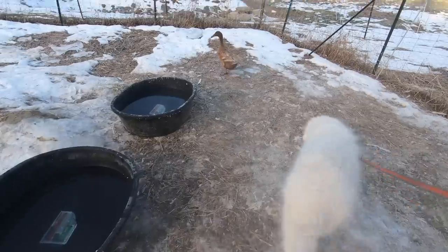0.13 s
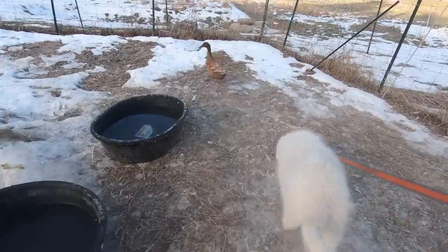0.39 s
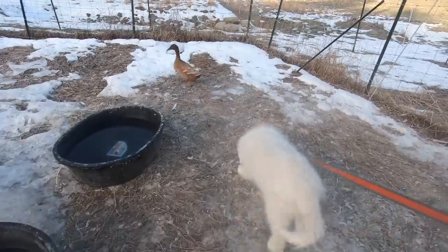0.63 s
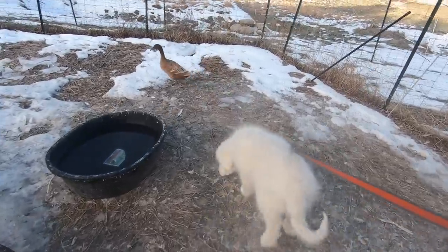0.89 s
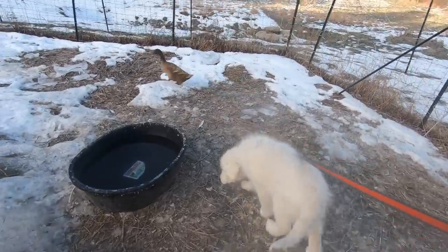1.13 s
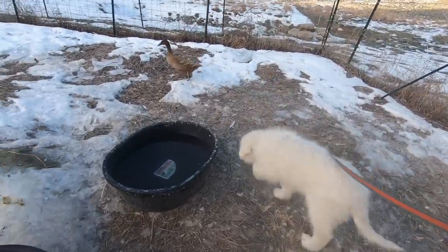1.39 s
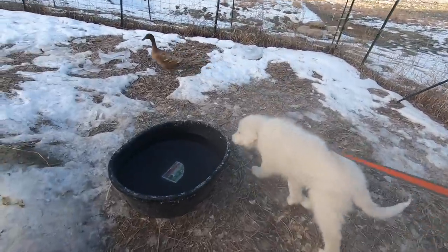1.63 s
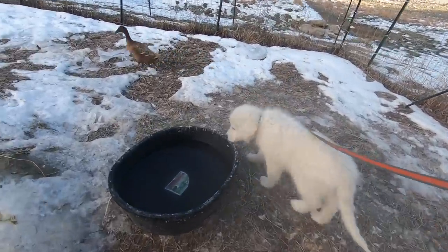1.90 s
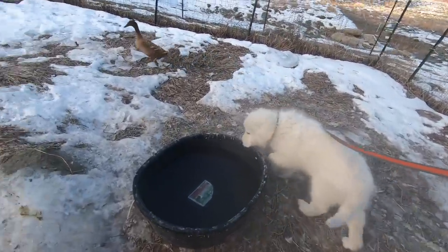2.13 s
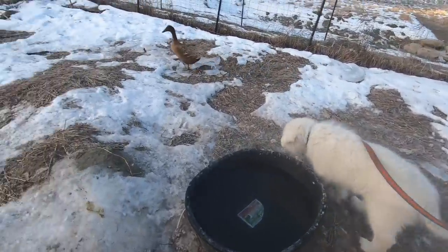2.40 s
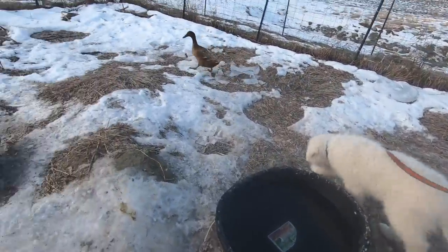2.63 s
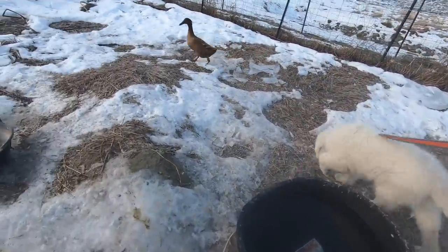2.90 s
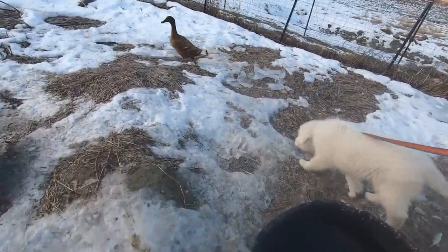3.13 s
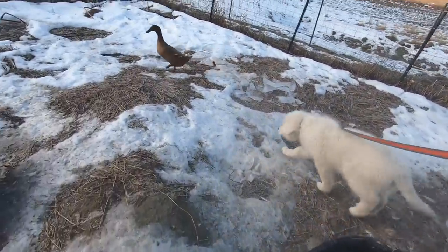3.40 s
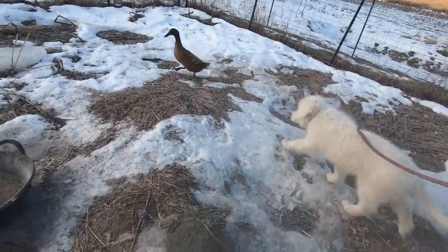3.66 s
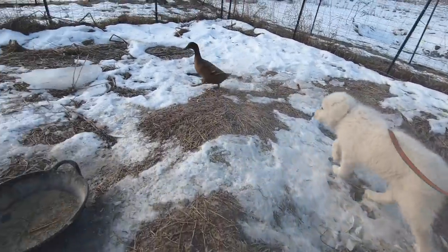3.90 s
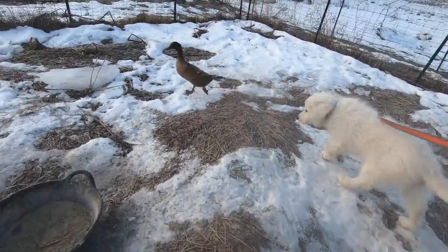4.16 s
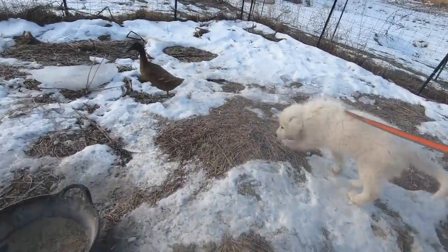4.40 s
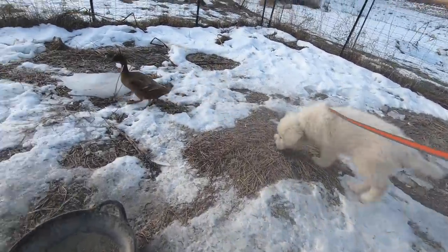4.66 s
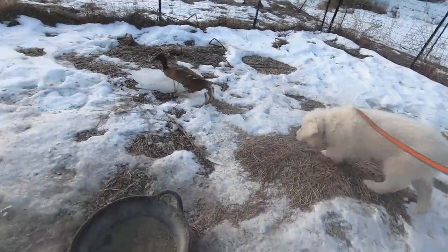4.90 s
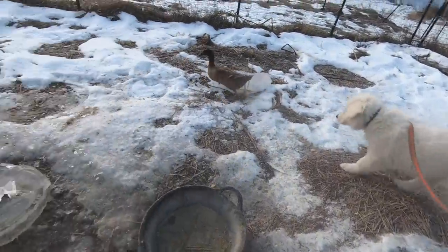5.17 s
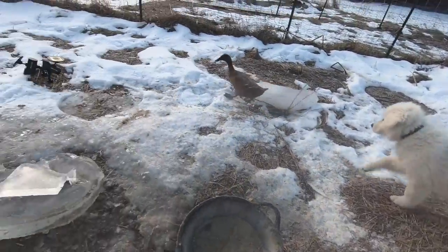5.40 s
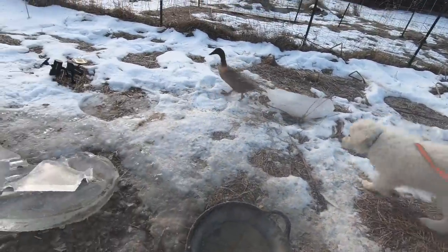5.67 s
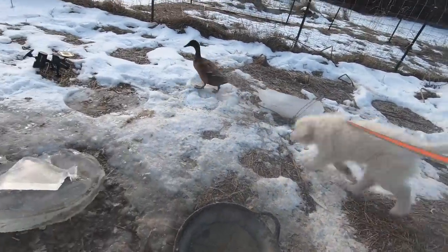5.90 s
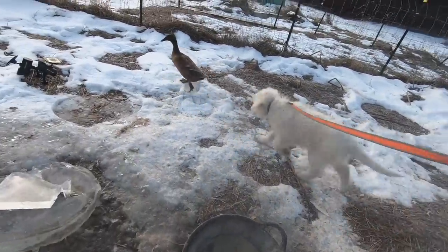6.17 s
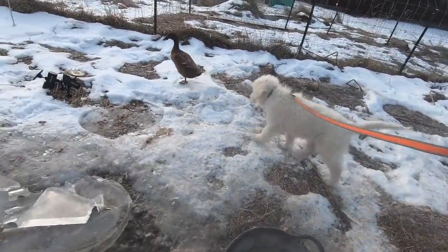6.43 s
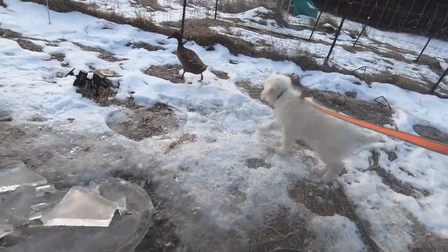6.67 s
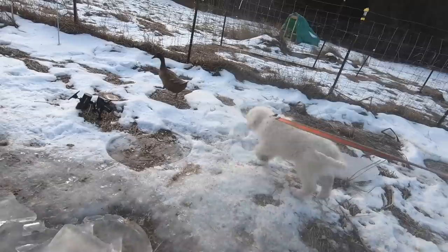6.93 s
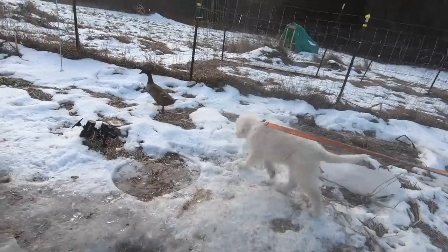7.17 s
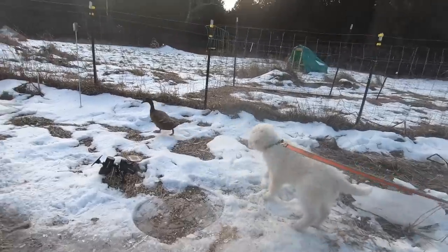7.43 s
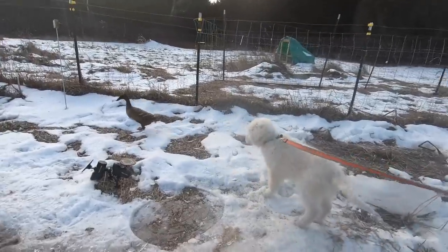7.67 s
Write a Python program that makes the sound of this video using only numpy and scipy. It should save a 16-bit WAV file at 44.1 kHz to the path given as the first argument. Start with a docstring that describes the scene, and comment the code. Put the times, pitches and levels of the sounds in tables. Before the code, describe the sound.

Close, uneven footsteps break frozen snow outdoors, with hollow thumps, sharp snaps and gritty grinding, busiest in the first second. Ducks to the left give brief raspy quacks about once a second and quieter peeps between. Clothing rustles brightly and the handheld microphone rumbles as it moves. A faint falling whine passes before three seconds; more icy ticks and cracks follow to the end.

```python
"""Ducks quack and peep in a snowy pen while boots and paws break the frozen crust; cloth rustles, a grip rumbles.
Steps: struck ground resonances, snaps with gritty ice spray, and patchy grinding noise.
Quacks: rough pulses and gated breath through throat, bill and nasal rings.
Peeps and one falling whine: wobbling harmonic stacks. All calls scatter briefly from fence and snow banks."""
import sys
import numpy as np
from scipy import signal
from scipy.fft import rfft, irfft, next_fast_len
from scipy.io import wavfile
from scipy.ndimage import uniform_filter1d

SR = 44100
rng = np.random.default_rng(int(sys.argv[2]) if len(sys.argv) > 2 else 0)


def field_ratio(decibels):
    """Amplitude ratio for a level in dB (20 dB per decade); scalars and array-likes work."""
    return 10 ** (np.asarray(decibels, dtype=float) / 20)


def digitize_waveform(pressure):
    """Quantize a signal to 16-bit integers and store it at the path in sys.argv[1].

    Rows of a 2-D input are taken as channels; values are limited to [-1, 1].
    """
    field = np.atleast_2d(pressure).T
    bounded = np.clip(field, -1, 1)
    quanta = np.round(bounded * 32767).astype(np.int16)
    wavfile.write(sys.argv[1], SR, quanta)


N = 344066

# bright spectrum of cloth and ice fizz: [f/Hz, level/dB]
BRIGHT_SPECTRUM = [(2350, 6), (4000, 5), (4610, 3), (8170, 3), (9750, -3.5), (11300, -20.5), (14000, -27),
                   (15700, -34)]
# cloth rustle over time: [t/s, level/dB]
CLOTH_LEVEL = [(0.0, -64), (.3, -62.5), (.55, -56.5), (.9, -51), (1.3, -63), (1.75, -57), (2.0, -60.5),
               (2.6, -58.5), (2.95, -70), (3.08, -48), (3.5, -64.5), (3.67, -58.5), (3.71, -49.5),
               (3.75, -55), (3.85, -50.5), (4.0, -59.5), (4.62, -51), (4.8, -55.5), (5.0, -48), (5.1, -59),
               (5.18, -45), (5.45, -63.5), (5.78, -55), (5.95, -56), (6.7, -57), (7.08, -57), (7.14, -50.5),
               (7.2, -60), (7.5, -61.5), (7.8, -61)]


def evened(x):
    """Scales to rms 1."""
    return x / np.sqrt(np.mean(x ** 2) + 1e-20)


def smooth_noise(count, size):
    """Slow random drift of rms 1, averaged over size samples."""
    return evened(uniform_filter1d(rng.standard_normal(count), size=size))


def read(points, hz):
    """Reads a spectrum on a log-frequency axis."""
    f, value = np.transpose(points)
    return np.interp(np.log(hz + 1), np.log(f + 1), value)


def over_time(points):
    """Reads a table of moments and values at every sample of the scene."""
    return np.interp(np.arange(N) / SR, *np.transpose(points))


def add(mix, s, sound, pan_db):
    """Places a sound at a moment; positive pan_db raises left over right."""
    part = mix[:, round(s * SR):][:, :len(sound)]
    part += (sound * field_ratio(np.outer([.5, -.5], pan_db)))[:, :part.shape[1]]


def unroll(rows):
    """Start time and the columns of a table, sample by sample."""
    s, *columns = np.transpose(rows)
    t = np.arange(s[0], s[-1], 1 / SR)
    return s[0], *(np.interp(t, s, c) for c in columns)


def resonate(x, hz, width_hz):
    """A fixed or moving resonance of gain 1: a one-pole low-pass around a turning carrier."""
    turn = np.exp(2j * np.pi * np.cumsum(hz * np.ones(len(x))) / SR)
    r = np.exp(-np.pi * width_hz / SR)
    return 2 * (turn * signal.lfilter([1 - r], [1, -r], x / turn)).real


def colour(x, points):
    """Filters by a spectrum."""
    return irfft(rfft(x, 2048) * field_ratio(read(points, np.fft.rfftfreq(2048, 1 / SR))), 2048)


def hiss(spectrum, level_db, patchy_db, grains_per_s, grain_db, size):
    """Stereo noise with drifting patches; grains land as short bursts across all its pitches."""
    # [f/Hz, left-right likeness]
    likeness = [(30, 0.18), (150, -0.62), (300, -0.16), (640, 0.19), (2000, 0.42), (6000, 0.035)]
    hop = size // 4
    frames, hz = N // hop + 5, np.fft.rfftfreq(size, 1 / SR)
    a, b, c, d, patches = rng.standard_normal((frames, len(hz), 5)).T
    patches = uniform_filter1d(patches, size=5, axis=0)
    patches = evened(uniform_filter1d(patches, size=20, axis=1))
    same = np.clip(read(likeness, hz), -1, 1)[:, None]
    left = a + 1j * b
    right = same * left + np.sqrt(1 - same ** 2) * (c + 1j * d)
    z = np.array([left, right]) * field_ratio(read(spectrum, hz)[:, None] + patchy_db * patches)
    bed = evened(signal.istft(z, nperseg=size, noverlap=size - hop)[1][:, :N])
    chance = rng.random((N, 2))
    hits = (chance[:, 0] < grains_per_s / SR) * field_ratio(-grain_db * np.log(chance[:, 1] + .01))
    hits = uniform_filter1d(hits, size=24)
    bursts = 1 + signal.lfilter([1], [1, -np.exp(-1 / (.002 * SR))], hits)  # 2 ms decay
    steady = np.sqrt(uniform_filter1d(bursts ** 2, size=8000))  # level_db alone sets slow loudness
    return bed * bursts / steady * field_ratio(level_db)


def grind():
    """Snow grains ground underfoot: patchy noise with sparse bursts."""
    # [f/Hz, level/dB]
    grind_spectrum = [(105, -53), (150, 12.5), (190, 6), (500, -11.5), (860, -5.5), (1590, -10),
                      (2290, -11.5), (6000, -27.5), (7800, -51), (13200, -120)]
    # [t/s, level/dB]
    grind_level = [(0.0, -42.5), (.12, -49.5), (.65, -53.5), (1.05, -45), (1.2, -56), (1.75, -48.5),
                   (1.95, -60.5), (2.25, -54), (2.95, -54), (3.5, -61.5), (3.7, -48.5), (3.9, -46.5),
                   (4.0, -53), (5.2, -66.5), (5.36, -42.5), (5.45, -65), (5.8, -61.5), (6.3, -52.5),
                   (6.7, -63), (6.95, -55), (7.3, -60), (7.47, -40), (7.6, -64), (7.8, -52)]
    return hiss(grind_spectrum, over_time(grind_level), patchy_db=2.5, grains_per_s=70, grain_db=4.2, size=1024)


def rustle():
    """Cloth friction: dense-grained bright noise with changing sheen and one swelling band of hiss."""
    # gain of the part above sheen_hz: [t/s, gain/dB]
    sheen = [(0, 9), (1.1, 0.5), (4.4, -5), (4.6, 9), (5.35, 9.5), (5.5, -3), (5.9, 16), (6.3, -9),
             (7.8, 8)]
    # swelling band: centre/s, half length to 1/e/s, f/Hz, width/Hz, gain (linear)
    swish = (0.5, 0.24, 7900, 1300, 0.92)
    sheen_hz = 10800
    cloth = hiss(BRIGHT_SPECTRUM, over_time(CLOTH_LEVEL), patchy_db=1.2, grains_per_s=160, grain_db=4.5, size=256)
    top = signal.sosfiltfilt(signal.butter(4, sheen_hz, "high", fs=SR, output="sos"), cloth)
    cloth = cloth + top * (field_ratio(over_time(sheen)) - 1)
    centre_s, half_s, swish_hz, width_hz, gain = swish
    swell = gain * np.exp(-((np.arange(N) / SR - centre_s) / half_s) ** 2)
    return cloth + swell * np.array([resonate(side, swish_hz, width_hz) for side in cloth])


def rumble():
    """The hand on the camera: patchy low-frequency noise without grains."""
    # [f/Hz, level/dB]
    rumble_spectrum = [(15, -7.5), (30, -10.5), (60, -11), (110, -47), (170, -17), (400, -110)]
    # [t/s, level/dB]
    grip_level = [(0.0, -54), (0.4, -42), (0.7, -78), (1.2, -76), (1.7, -60.5), (2.1, -83), (2.6, -68),
                  (3.25, -53), (3.6, -70), (4.2, -60), (4.7, -61.5), (5.15, -38.5), (5.6, -74), (6.25, -63),
                  (6.7, -101), (7.25, -43.5), (7.6, -50.5), (7.8, -85)]
    return hiss(rumble_spectrum, over_time(grip_level), patchy_db=5, grains_per_s=0, grain_db=0, size=2048)


def thuds():
    """A first blow and uneven settling of the sole shake the hollow crust and push the ground."""
    # footfalls: [t/s, crust thump peak/dB, ground push peak/dB, settling t60/s]
    footfalls = [(0.085, -37.5, -33, 0.17), (0.369, -27, -34.5, 0.24), (0.552, -45.5, -47.5, 0.15),
                 (0.852, -19, -40, 0.085), (0.884, -26.5, -26, 0.12), (1.486, -68, -26, 0.26),
                 (1.553, -29, -64, 0.028), (2.013, -38.5, -55, 0.092), (2.238, -35.5, -39, 0.1),
                 (2.277, -70, -32.5, 0.11), (2.364, -43, -33.5, 0.22), (3.106, -34, -25.5, 0.12),
                 (3.692, -37, -97, 0.098), (4.347, -24, -34.5, 0.26), (4.861, -40.5, -90, 0.059),
                 (4.994, -36, -28, 0.12), (5.013, -34, -33.5, 0.076), (5.021, -43, -24, 0.064),
                 (5.038, -30.5, -30, 0.1), (5.138, -35.5, -62, 0.042), (6.007, -45, -32.5, 0.17),
                 (6.073, -37, -72, 0.1), (6.795, -29.5, -45, 0.036), (6.819, -26.5, -25.5, 0.18),
                 (7.435, -29, -36, 0.27), (7.487, -36, -19, 0.087)]
    thump_hz, push_hz = 167.7, 67
    mix, t = np.zeros((2, N)), np.arange(9000) / SR
    for s, thump_db, push_db, t60_s in footfalls:
        settling = 0.11 * rng.standard_normal(9000) * field_ratio(-60 * t / t60_s)
        blows = (t < .001) / 30 + settling
        thump = resonate(blows, thump_hz, 65) + 0.21 * resonate(blows, 3.4 * thump_hz, 270)
        thump = resonate(thump, thump_hz, 200)
        push = resonate(blows, push_hz * rng.uniform(0.73, 1.02), 47)
        push = resonate(push, push_hz, 240)
        step = field_ratio(thump_db) * thump / abs(thump).max() + field_ratio(push_db) * push / abs(push).max()
        add(mix, s, step, -.6)
    return mix


def add_crack(mix, s, body_db, plate_hz, treble_db, pan_db, t60_s):
    """A creak, a snap and a gritty spray of ice splinters; the broken plate adds its own pitch."""
    # [f/Hz, level/dB]
    body_spectrum = [(71, -103), (120, 3.5), (608, -2.5), (1080, 2), (1920, -1), (2570, 3), (3640, -1),
                     (4500, -8), (6800, -19), (9900, -53)]
    snap, creak_gain, lead = 5.5, .25, 200  # creak leads by this many samples
    t = np.arange(1800) / SR
    low, high, chance = rng.standard_normal((1800, 3)).T
    grit = 0.48 + signal.lfilter([1], [1, -.97], (chance > 2.4) | (t == 0))
    spray = grit * field_ratio(-60 * t / max(t60_s, .004)) * np.minimum(t / 0.0013, 1)
    low[70], high[70], spray[70] = -snap, -snap, 1  # first break

    def broken(part, spectrum):
        creak = creak_gain * grit[-lead:] * part[-lead:] * np.hanning(2 * lead)[:lead]
        return colour(np.r_[creak, part * spray], spectrum)

    body, fizz = broken(low, body_spectrum), broken(high, BRIGHT_SPECTRUM)
    body = body + 5.9 * resonate(body, plate_hz, .5 * plate_hz)
    fizz = fizz + 3 * resonate(fizz, 3000 + 5500 * rng.random(), 1500)  # each has its own bright pitch
    sound = body / abs(body).max() + field_ratio(treble_db) * fizz / abs(fizz).max()
    add(mix, s - lead / SR, field_ratio(body_db) * sound, pan_db)


def splinters():
    """Faint splinters at random moments, thicker where the cloth rustles."""
    mix = np.zeros((2, N))
    moments = np.arange(.01, N / SR, .001)
    busy = np.cumsum(field_ratio(np.interp(moments, *np.transpose(CLOTH_LEVEL))))
    for when, size, plate, side in rng.random((45, 4)):
        s = np.interp(when * busy[-1], busy, moments)
        body_db = -56 - 2 * np.log(size + 0.092)
        add_crack(mix, s, body_db, 800 + 2000 * plate, treble_db=8, pan_db=-28 * side, t60_s=0.01)
    return mix


def loud_cracks():
    """The crust gives way: short snaps of many strengths and pitches; the quieter ones are given longer decays."""
    # [t/s, body peak/dB, plate f/Hz, treble re body/dB, left-right/dB]
    crack_rows = [(0.37, -11.5, 1510, -23, -3.5), (0.377, -18, 2400, -28, 0), (0.38, -15.5, 740, -22, 0),
                  (0.387, -26, 960, -10, -25), (0.428, -19.5, 780, -16, -4), (0.708, -28, 3160, -5, -7),
                  (0.7544, -20, 970, -4, -9), (0.854, -23, 1120, 1.5, -14.5), (0.88, -32, 3240, 12, -4),
                  (0.89, -33, 2150, 9.5, -18), (0.903, -26, 1940, -7, -8), (0.993, -25, 1090, -6, -10),
                  (1.007, -27.5, 1200, -1, -10), (1.272, -36, 1070, -29, 2),
                  (1.778, -33.5, 1000, -19.5, -18), (1.823, -38.5, 940, -1, -19),
                  (2.009, -31, 1120, -4.5, 7), (2.134, -38, 1310, -17, 1), (2.215, -45.5, 2920, 12.5, 2),
                  (2.304, -45.5, 1250, -8, -32), (2.419, -28, 1140, -8, -15),
                  (2.687, -29.5, 1480, -2.5, 2.5), (3.573, -41, 1190, -23, 4), (3.687, -36, 3000, -4, -32),
                  (3.891, -24.5, 875, -7, -15), (3.98, -32.5, 1800, 6.5, -10), (4.043, -46, 940, -23, -17),
                  (4.219, -42, 950, -20, -13), (4.311, -26.5, 900, -28, -16), (4.616, -35.5, 2190, -5, -18),
                  (4.863, -36, 1120, -25, 7), (5.13, -33, 1100, -23, 5), (5.136, -28.5, 1100, -26, 5),
                  (5.323, -36.5, 1100, -17, 2), (5.529, -36.5, 900, -1, -1), (5.911, -40, 1100, -22, 0),
                  (6.153, -19.5, 2080, -10, -9), (6.408, -35, 610, -26, -10), (6.79, -41, 2000, -1, -11.5),
                  (7.11, -38, 745, 10, -3), (7.127, -31.5, 3600, 11, 3), (7.167, -28, 3600, 4.5, 8.5),
                  (7.172, -36, 3500, 6, -13), (7.428, -30.5, 2500, -9, -17.5)]
    mix = np.zeros((2, N))
    for s, body_db, plate_hz, treble_db, pan_db in crack_rows:
        t60_s = 0.018 * field_ratio(0.4 * (-18 - body_db))
        add_crack(mix, s, body_db, plate_hz, treble_db, pan_db, t60_s)
    return mix


def ticks():
    """Thin bright ticks of ice or straw: short cracks with a weak body."""
    # [t/s, treble peak/dB, left-right/dB]
    tick_rows = [(0.98, -36.5, -6), (2.5274, -24.5, -6), (2.9073, -42, -18), (3.088, -34.5, -26.5),
                 (3.125, -34.5, -21), (3.181, -41, -28), (3.3088, -43.5, -26), (3.775, -32, -14),
                 (3.787, -42, -26), (3.8341, -26.5, -6), (3.867, -41, -26), (4.699, -30, -16),
                 (4.826, -35, 9), (5.254, -40, 0), (5.7592, -28.5, -6.5), (6.1811, -33, 2),
                 (6.2208, -32, -1), (6.6887, -36.5, -14.5), (6.8172, -25.5, -6), (6.8414, -26, -9),
                 (6.8688, -34, -13), (6.933, -35.5, -13), (6.9656, -31.5, -14.5), (6.986, -31.5, -6)]
    mix, body_re_treble_db = np.zeros((2, N)), -10
    for s, peak_db, pan_db in tick_rows:
        add_crack(mix, s, peak_db + body_re_treble_db, 2500, -body_re_treble_db, pan_db, t60_s=0.0054)
    return mix


def at_feet(mix):
    """Turns the right channel's phase by frequency for sounds at the feet."""
    # [f/Hz, phase lag/rad]
    port_turn = [(300, -0.5), (3270, -1), (5200, 6), (7000, -2.5), (12000, -2)]
    size = next_fast_len(N)
    lag = read(port_turn, np.fft.rfftfreq(size, 1 / SR))
    right = irfft(rfft(mix[1], size) * np.exp(-1j * lag), size)
    return np.array([mix[0], right[:N]])


def tone(hz, level_db, harmonics_db, wobble):
    """A whistled or sung note: harmonics on a slightly unsteady pitch, roughened by breath."""
    shake = smooth_noise(len(hz), 200)
    angle = 2 * np.pi * np.cumsum(hz * (1 + wobble * shake)) / SR
    stack = sum(field_ratio(db) * np.sin((k + 1) * angle) for k, db in enumerate(harmonics_db))
    stack = stack * (1 + .15 * smooth_noise(len(hz), 160))
    return field_ratio(level_db) * evened(stack) * signal.windows.tukey(len(hz), .25)


def peeps():
    """Short whistles on a bent pitch; overtones grow as the bill opens."""
    # [t/s, length/s, start f/Hz, middle f/Hz, end f/Hz, level before fades/dB, octave re fundamental at end/dB]
    peep_rows = [(0.765, 0.034, 1050, 1026, 990, -37.5, -6), (1.288, 0.04, 1550, 1404, 970, -49, -7),
                 (2.022, 0.032, 1120, 1049, 1057, -38.5, -4), (2.863, 0.034, 1210, 1075, 920, -43, -6.5),
                 (3.601, 0.052, 850, 963, 890, -38.5, 3.5), (4.879, 0.043, 1320, 1144, 936, -45.5, -31),
                 (5.145, 0.028, 1020, 1050, 690, -46.5, -3), (5.337, 0.041, 1101, 1266, 900, -39.5, -10),
                 (5.743, 0.051, 1020, 820, 1040, -46, -2.5), (6.109, 0.034, 1137, 1067, 990, -42.5, -5.5),
                 (6.554, 0.049, 968, 960, 932, -44, -1), (6.559, 0.0397, 850, 724, 710, -46, -4),
                 (6.866, 0.0234, 1120, 1054, 950, -42.5, -5), (7.778, 0.085, 1163, 1314, 1280, -46, -10)]
    third_re_octave_db = -13
    mix = np.zeros((2, N))
    for s, length_s, start_hz, middle_hz, end_hz, level_db, octave_db in peep_rows:
        u = np.linspace(0, 1, round(length_s * SR))
        hz = np.polyval(np.polyfit([0, .5, 1], [start_hz, middle_hz, end_hz], deg=2), u)
        second_db = octave_db - 9 * (1 - u) ** 2
        call = tone(hz, level_db, [0, second_db, second_db + third_re_octave_db], wobble=.016)
        add(mix, s, call * np.sin(np.pi * u ** .8) ** .6, 7)  # flock to the left
    return mix


def quack(length_s, top_db, pitch_hz, rise, attack_s, bright_db, bill, nasal_hz, nasal_db):
    """Sharp pulses of the syrinx, with breath gated by each cycle, ring in throat and bill; weak effort is dull."""
    # chest, then upper rings: [f/Hz, width of one pass/Hz, level/dB]
    throat = [(180, 75, -4.5), (696, 960, -1), (1298, 240, 19), (2092, 230, 7.5), (2965, 660, 2.5),
              (3877, 430, 1), (5370, 1200, -11)]
    t = np.arange(0, length_s, 1 / SR)
    count, u = len(t), t / length_s
    # effort starts low, holds, then falls ever faster
    onset_db = -10.5 * np.maximum(1 - t / max(attack_s, .002), 0) ** 2
    effort_db = top_db + onset_db - 17 * u ** 4.65
    lost_db = effort_db.max() - effort_db

    slide = rise * np.clip((u - 0.299) / (0.849 - 0.299), 0, 1)
    scoop = 0.0663 * np.exp(-t / 0.01524)  # pitch starts low and settles
    hz = pitch_hz * (1 + slide - scoop)
    rough = np.clip(.33 + .04 * lost_db, 0, 1)  # breath share; weak effort lets the folds flutter
    shake = smooth_noise(count, 150)
    turns = np.cumsum(hz * (1 + 0.07 * rough * shake)) / SR
    folds = sum(np.cos(2 * np.pi * k * turns) for k in range(1, 32))
    puffs = (0.3 + np.exp(-(turns % 1) / .4)) * rng.standard_normal(count)
    drive = (1 - rough) * field_ratio(1.7 * shake[::-1]) * evened(folds) + rough * evened(puffs)
    # keeps pulses and breath below about 6.5 kHz
    drive = signal.sosfilt(signal.butter(4, 6500, fs=SR, output="sos"), drive)

    bill = bill * (1 + 0.011 * (2 * u - 1))  # keeps opening
    bill = bill * (1 - 0.006 * lost_db + 0.015 * evened(uniform_filter1d(shake, size=600)))
    (chest_hz, chest_width_hz, chest_db), *upper = throat
    wander = rng.standard_normal((count, len(upper)))
    for _ in range(2):
        wander = uniform_filter1d(wander, size=400, axis=0)
    wander_db = 4 * evened(wander).T
    ring = field_ratio(nasal_db) * resonate(resonate(drive, nasal_hz, 350), nasal_hz, 350)
    for k, (f, width_hz, db) in enumerate(upper):
        ring_hz = f * bill if k < 2 else f  # the bill moves only the two lowest
        ring_db = db + wander_db[k] - .3 * k * lost_db + bright_db * (k in (3, 4))
        passed = resonate(resonate(drive, ring_hz, width_hz), ring_hz, width_hz)
        ring = ring + (-1) ** k * field_ratio(ring_db) * passed
    level = np.sqrt(uniform_filter1d(ring ** 2, size=600) + 1e-12)

    # the chest tone grows less than the rasp; -28 dB is usual effort
    chest_gain = np.minimum(t / 0.023, 1) * field_ratio(chest_db - (top_db + 28))
    chest = chest_gain * resonate(resonate(folds, hz, chest_width_hz), chest_hz, 2 * chest_width_hz)
    return field_ratio(effort_db) * (chest - ring / level) * signal.windows.tukey(count, .2)


def quacks():
    """Single quacks, each with its own voice manner and direction."""
    # [t/s, length/s, effort/dB, f before scoop/Hz, pitch rise (share), attack/s]
    quack_rows = [(1.081, 0.08, -29.5, 198.7, 0.22, 0.032), (1.633, 0.071, -26.5, 210.4, 0.097, 0.036),
                  (2.49, 0.054, -32, 212.5, -0.22, 0.039), (3.354, 0.078, -33, 192.4, 0.14, 0.014),
                  (3.628, 0.047, -27, 220.8, 0.089, 0.026), (4.093, 0.069, -30.5, 185.8, 0.2, 0.017),
                  (4.34, 0.1, -24.5, 232.5, 0.037, 0.033), (4.664, 0.085, -31.5, 219.2, 0.29, 0.025),
                  (6.818, 0.055, -29.5, 214.2, 0.0057, 0.032), (7.225, 0.058, -33, 191.7, 0.072, 0.029)]
    # [two upper rings' brightness/dB, bill factor on ring f, left-right/dB, nasal f/Hz, nasal level/dB]
    manners = [(-2.5, 1.05, 3.5, 1690, 9.5), (-2, 1.033, 5, 2210, 8.5), (-3, 0.94, 7, 1760, 14),
               (-1, 0.98, 7, 1640, 12.5), (5, 0.96, 6, 1670, 15.5), (-6.5, 1.013, 4.5, 1900, 6.5),
               (3.5, 0.9, 5, 1740, 19), (-2, 0.92, 8, 1740, 12), (-3, 0.99, 4.5, 1860, 9.5),
               (-5, 1.015, 5, 1770, 6)]
    mix = np.zeros((2, N))
    for (s, *call), (bright_db, bill, pan_db, nasal_hz, nasal_db) in zip(quack_rows, manners):
        add(mix, s, quack(*call, bright_db, bill, nasal_hz, nasal_db), pan_db)
    return mix


def whine():
    """A falling sung note with one fixed mouth resonance."""
    # [t/s, f/Hz, level before mouth ring/dB]
    whine_path = [(2.695, 560, -55), (2.74, 450, -53), (2.772, 310, -48), (2.82, 290, -47),
                  (2.865, 235, -49)]
    # harmonics 1, 2, ..: [level/dB]
    whine_harmonics = [0, -6, -13, -14, -14, -14, -16, -18, -20, -22]
    mix = np.zeros((2, N))
    s, hz, level_db = unroll(whine_path)
    note = tone(hz, level_db, whine_harmonics, wobble=.03)
    add(mix, s, note + 3.7 * resonate(note, 1464, 104), 3)
    return mix


def scattered(calls):
    """Adds a short decaying noise echo from fence and snow banks."""
    t = np.arange(6000) / SR
    scatter = rng.standard_normal((2, 6000)) * field_ratio(-60 * t / 0.15) * (t > .004)
    scatter = scatter / np.linalg.norm(scatter[0])
    return calls + field_ratio(-12) * signal.oaconvolve(calls, scatter, axes=1)[:, :N]


def scene():
    """Motion noises, steps, breaking crust and birds."""
    motion = grind() + rustle() + rumble()
    crust = at_feet(splinters() + loud_cracks() + ticks())
    calls = scattered(peeps() + quacks() + whine())
    return motion + thuds() + crust + calls


def band_limit(x):
    """A steep low-pass at the top of the band."""
    return signal.sosfilt(signal.butter(12, 15820, fs=SR, output="sos"), x)


def record(dry):
    """The microphone pair loses most left-right difference at 70-454 Hz, but not in the deepest rumble."""
    mid, side = (dry[0] + dry[1]) / 2, (dry[0] - dry[1]) / 2
    bass = signal.butter(2, [70, 454], "band", fs=SR, output="sos")
    side = side - 0.75 * signal.sosfiltfilt(bass, side)
    return band_limit(np.array([mid + side, mid - side]))


dry = scene()
out = record(dry)
digitize_waveform(out)
```